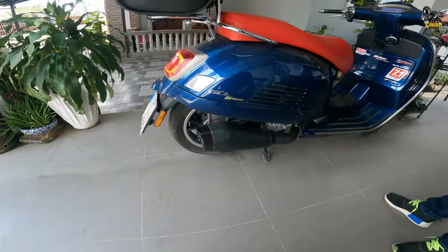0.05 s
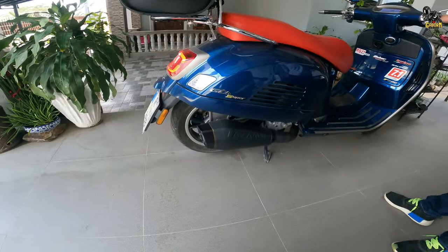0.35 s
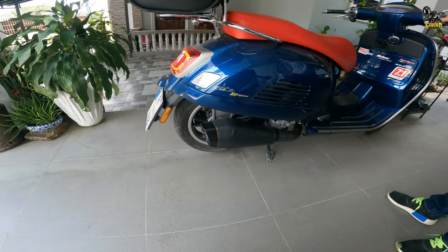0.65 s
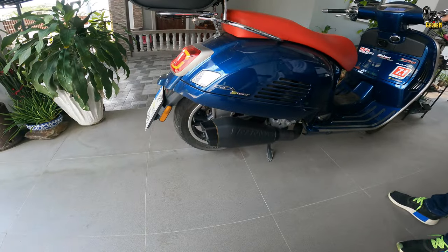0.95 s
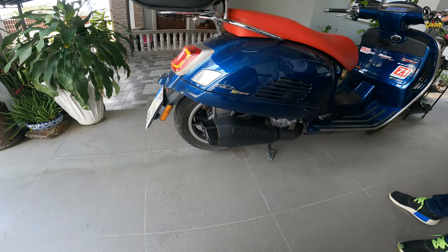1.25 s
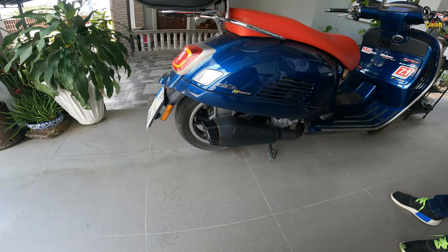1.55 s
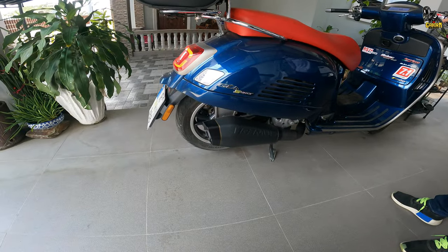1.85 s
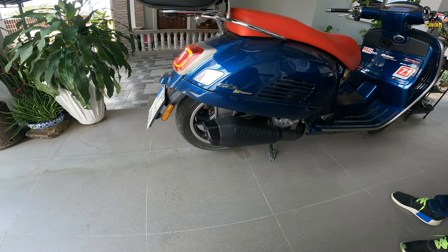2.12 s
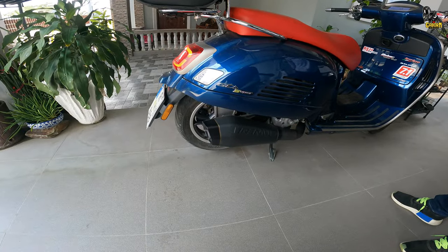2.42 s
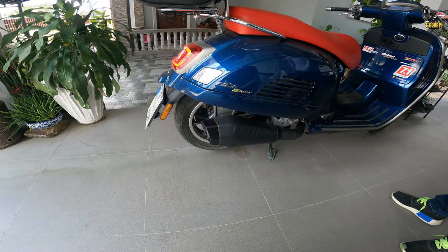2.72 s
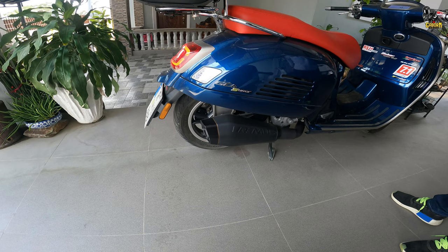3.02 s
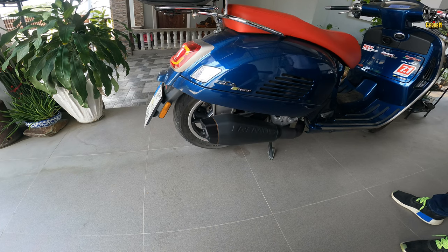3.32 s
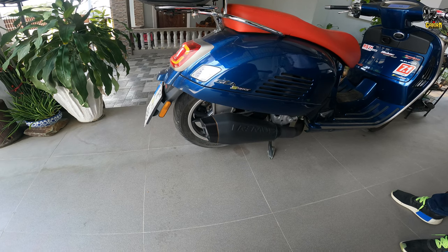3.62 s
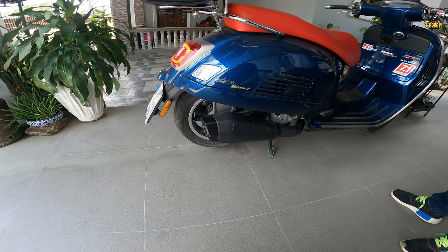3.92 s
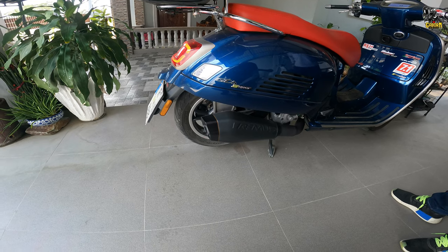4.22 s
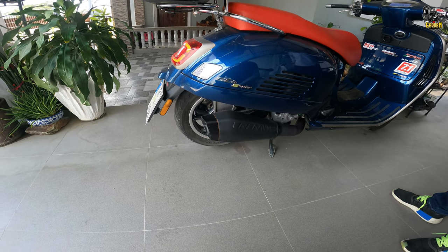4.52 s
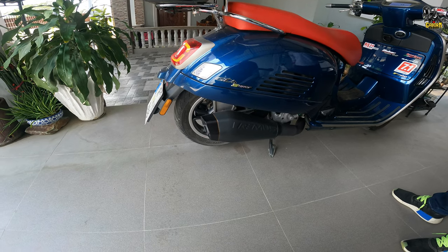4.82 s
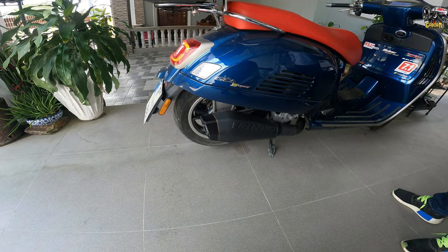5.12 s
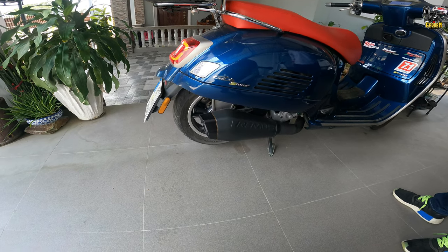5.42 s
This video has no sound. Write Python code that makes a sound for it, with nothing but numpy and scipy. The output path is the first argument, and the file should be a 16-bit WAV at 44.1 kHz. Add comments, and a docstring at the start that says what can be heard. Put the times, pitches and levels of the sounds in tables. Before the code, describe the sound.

Quiet outdoor air and a low hum open the scene, with a few very faint, high whistled notes. At about 0.6 seconds a scooter's starter gives a short, grainy blip. A sharp metallic click follows at 0.9 seconds, while the fuel pump whines softly until 1.5 seconds. At 2 seconds the starter cranks with a pulsing, rattling gear whine, and the single-cylinder engine catches at around 2.5 seconds. It runs slightly fast, then settles to about fifteen deep exhaust thuds a second, with metallic knocking and valve ticks on top. It revs lightly at 4 seconds, drops back to idle, and revs higher at about 5.2 seconds, still running at the end, near 5.6 seconds. The microphone is close, on a porch with a short echo, and the strongest thuds slightly overload it. Everything sits on the left; the right carries only faint hiss.

```python
"""A single-cylinder scooter starts on a tiled porch, idles near 15 firings a second and revs lightly twice.
First the starter blips and the fuel pump primes; then whining gears crank the engine until it catches.
Each exhaust puff and its return gulp ring pipe and muffler, thudding hard enough to overload a near
microphone, while knock and valve taps ring the crankcase. Outdoor air, a hum and a few faint whistled
notes lie behind. All of this is in the left channel; the right holds only faint hiss."""
import sys
import numpy as np
from scipy import signal
from scipy.fft import rfft, irfft, next_fast_len
from scipy.io import wavfile

SR = 44100
rng = np.random.default_rng(int(sys.argv[2]) if len(sys.argv) > 2 else 0)


def master_out(mix):
    """Clip the mix to full scale and print it as 16-bit PCM to the path in sys.argv[1]."""
    frames = np.transpose(np.atleast_2d(mix))
    ceiling = np.clip(frames, -1, 1)
    pcm = np.round(ceiling * 32767).astype(np.int16)
    wavfile.write(sys.argv[1], SR, pcm)


N = 245032
TIME = np.arange(N) / SR
SIZE = next_fast_len(N + SR)
HZ = np.fft.rfftfreq(SIZE, 1 / SR) + 1e-6

# tone colour of the small metal parts (frequency [Hz], level [dB])
SMALL_PARTS_COLOUR = [(150, -58.5), (250, -19), (353, -28), (398, -9), (553, -12.5), (669, -15), (781, -10),
                      (995, -20), (1560, -1.5), (1790, -6), (2240, -2), (2660, -8.5), (4630, -14.5),
                      (10800, -38.5), (15500, -43)]
# swell of the engine's running noise (time [s], level [dB])
RUNNING_LEVEL = [(2.47, -50.5), (2.7, -44.5), (2.95, -49), (3.5, -52.5), (3.9, -56), (3.98, -52),
                 (4.27, -49.5), (4.7, -55), (5.16, -54), (5.21, -45.5), (5.56, -50.5)]


def amp(db):
    """Decibels to gain."""
    return 10 ** (np.asarray(db) / 20)


def unit(x):
    """Scales to rms 1."""
    return x / np.sqrt(np.mean(x ** 2) + 1e-20)


def level(rows):
    """Gain along a (time [s], level [dB]) curve, silent outside it."""
    s, db = np.transpose(rows)
    return amp(np.interp(TIME, s, db, left=-np.inf, right=-np.inf))


def colour(points):
    """EQ curve through (frequency [Hz], level [dB]) points."""
    hz, db = np.transpose(points)
    return amp(np.interp(np.log(HZ), np.log(hz + 1), db))


def causal(gain):
    """Unit-power response with this EQ shape that rings only after the blow."""
    log_gain = np.log(np.maximum(unit(gain), 1e-5))
    cepstrum = irfft(log_gain, SIZE)
    cepstrum[1:SIZE // 2] *= 2
    cepstrum[SIZE // 2 + 1:] = 0
    return np.exp(rfft(cepstrum))


def through(x, response):
    """Filters by a frequency response."""
    return irfft(rfft(x, SIZE) * response, SIZE)[:N]


def resonance(hz, width):
    """Response of one mode, 1 at its peak."""
    return 1 / (1 + 1j * (HZ ** 2 - hz ** 2) / (HZ * width))


def noise():
    """White noise of rms 1."""
    return rng.standard_normal(N)


def drift(hz):
    """Smooth random wander of rms 1, rolling off above hz."""
    return unit(through(noise(), np.exp(-(HZ / hz) ** 2)))


def tone(hz):
    """Sine of rms 1 along a pitch curve."""
    return np.sqrt(2) * np.sin(2 * np.pi * np.cumsum(hz) / SR)


def bursts(times, gains, decay_s):
    """Envelope of sudden blows that die away."""
    blows = np.zeros(N + SR)
    np.add.at(blows, np.round(times * SR).astype(int), gains)
    return signal.lfilter([1], [1, -np.exp(-1 / (decay_s * SR))], blows[:N])


def surges(rows, fall_db_per_s, rise_db_per_s=597):
    """Envelope of surges that rise quickly, hold and run down."""
    curves = [db - rise_db_per_s * np.maximum(s - TIME, 0)
              - fall_db_per_s * np.maximum(TIME - s - hold, 0) for s, hold, db in rows]
    return amp(np.max(curves, axis=0))


def puffs(times, volumes, widths):
    """Bell-shaped puffs, each holding a given volume of gas."""
    at = np.round(times * SR).astype(int)[:, None] + np.arange(-512, 513)
    bells = np.exp(-.5 * ((at / SR - times[:, None]) / widths[:, None]) ** 2) / widths[:, None]
    return np.bincount(at.ravel(), (volumes[:, None] * bells).ravel(), N)[:N] / np.sqrt(2 * np.pi)


def metal(points):
    """Response of the engine's metal: a broad colour with ringing modes standing out."""
    # modes of crankcase and covers (frequency [Hz], width [Hz], level against the broad colour [dB])
    case_modes = [(1281, 100, 0), (1475, 27, -6.5), (1578, 44, -3), (1910, 21, -4.5), (2190, 15, -9),
                  (2930, 14, -16.5), (3080, 40, -2), (5270, 32, -4)]
    peaks = sum(amp(db) * abs(resonance(hz, width)) ** 2 for hz, width, db in case_modes)
    return causal(colour(points) * (1 + peaks))


def hiss():
    """Faint hiss that sinks as the engine catches."""
    # tilt of the hiss (frequency [Hz], level [dB])
    tilt = [(20, -2.5), (200, -11), (1000, -18.5), (4000, -23), (15000, -32)]
    # its fade (time [s], level [dB])
    fade = [(0, -61.5), (2.35, -62.5), (2.6, -68), (3.2, -70.5), (5.56, -74)]
    return level(fade) * unit(through(noise(), colour(tilt)))


def outdoors(air_db=-50, hum_db=-59, hum_hz=119.2):
    """A bed of outdoor air and a wavering far hum."""
    # rumble-heavy air (frequency [Hz], level [dB])
    air_colour = [(12, -34.5), (20, -2.5), (59, -6.5), (90, -13), (122, -7), (180, -21), (372, -24.5),
                  (631, -28.5), (746, -27), (1200, -32.5), (1380, -36.5), (2330, -39), (15500, -55.5)]
    air = amp(air_db + drift(13)) * unit(through(noise(), colour(air_colour)))
    hum = amp(hum_db + 2 * drift(6)) * tone(hum_hz * (1 + 0.017 * drift(7.2)))
    return air + hum


def whistle(fuzz_hz=420):
    """Far, fuzzy notes that swell and fade as they fall in pitch."""
    # whistled notes (start [s], length [s], first pitch [Hz], last pitch [Hz], level [dB])
    notes = [(0, 0.13, 6300, 5660, -65), (0.103, 0.19, 5500, 4750, -68), (0.264, 0.11, 3720, 3680, -65.5)]
    out = np.zeros(N)
    for start, length, first_hz, last_hz, db in notes:
        progress = np.clip((TIME - start) / length, 0, 1)
        swell = np.sqrt(abs(np.sin(np.pi * progress)))
        out += amp(db) * swell * tone(first_hz + (last_hz - first_hz) * progress)
    return out * drift(fuzz_hz)


def porch(x, wet_db=-11, t60_s=.5, predelay_s=.006):
    """Adds a short diffuse tail from tiles and walls."""
    t = TIME[:SR // 2]
    tail = rng.standard_normal(len(t)) * 10 ** (-3 * t / t60_s) * (t > predelay_s)
    return x + amp(wet_db) * signal.fftconvolve(x, tail / np.linalg.norm(tail))[:N]


def fuel_pump(waver=0.0037, whirr_db=-6):
    """The fuel pump whines in a soft whirr while it builds pressure."""
    # priming envelope (time [s], level [dB])
    priming = [(.62, -88), (.78, -57), (1.1, -57.5), (1.2, -57), (1.4, -58.5), (1.45, -61), (1.5, -90)]
    # partials of the whine (frequency [Hz], level [dB])
    partials = [(883, -3), (3429, -20), (6853, -22.5)]
    speed = 1 + waver * drift(130)
    whirr = amp(whirr_db) * through(noise(), metal(SMALL_PARTS_COLOUR))
    whine = sum(amp(db) * tone(hz * speed) for hz, db in partials)
    return level(priming) * (whirr + whine)


def clicks():
    """The starter drive and relays snap home."""
    # metal snaps (time [s], level [dB], decay [s])
    snaps = [(0.027, -56, 0.047), (.574, -54, 0.0054), (.917, -30, 0.011), (1.415, -55.5, 0.0062),
             (2.012, -60.5, 0.0086)]
    blows = sum(bursts(np.array([s]), amp(db), decay) for s, db, decay in snaps)
    return through(blows * noise(), metal(SMALL_PARTS_COLOUR))


def starter_blip(grain_db=3):
    """A first grainy jab of the starter runs down without the engine catching."""
    # surges of the blip (start [s], hold [s], level [dB])
    jabs = [(.605, 0.072, -34), (.735, 0.0067, -35), (.85, 0.0075, -46.5)]
    grain = unit(amp(grain_db * drift(400)))
    return through(surges(jabs, fall_db_per_s=127) * grain * noise(), metal(SMALL_PARTS_COLOUR))


def starter_crank(rattle_db=-0.5, chatter=0.16, waver=0.009, flutter_db=3):
    """Gear teeth whine and rattle, chattering as the armature turns."""
    # one surge for each compression (start [s], hold [s], level [dB])
    compressions = [(2.05, 0.049, -35), (2.142, 0.1, -34), (2.293, 0.029, -33.5), (2.38, 0.022, -30.5)]
    # gear speed, sagging under compression (time [s], tooth rate [Hz])
    tooth_rate = [(2.0, 1339), (2.05, 1551), (2.1, 1608), (2.16, 1382), (2.22, 1566), (2.28, 1667),
                  (2.38, 1554), (2.42, 1386), (2.52, 1253)]
    # tooth tone, armature sidebands and harmonics (multiple of the tooth rate, level [dB])
    partials = [(1, -2), (1.189, -16), (1.4, -9.5), (1.999, -11.5), (3, -15.5)]
    # colour of the rattle (frequency [Hz], level [dB])
    rattle_colour = [(260, -52.5), (450, -17), (661, -18.5), (767, -16), (1030, -26), (1560, -5.5),
                     (1780, -13), (2230, -6.5), (2620, -10.5), (3130, -10), (3690, -15.5), (4880, -14.5),
                     (7500, -33), (11500, -33), (15500, -55)]
    effort = surges(compressions, fall_db_per_s=290)
    mesh_hz = np.interp(TIME, *np.transpose(tooth_rate)) * (1 + waver * drift(120))
    whine = sum(amp(db) * tone(k * mesh_hz) for k, db in partials)
    shake = unit(np.maximum(1 + chatter * tone(mesh_hz / 4), 0))
    rattle = through(effort * shake * noise(), metal(rattle_colour))
    flutter = unit(amp(flutter_db * drift(55)))
    return amp(rattle_db) * rattle + effort * whine * flutter


def engine_cycles(first_firing_s=2.5497, idle_hz=15, load_scatter_db=.45, knock_scatter_db=1.6):
    """Speed times each cycle and load sets its strength; returns one array per column of coughs."""
    # uneven first strokes, on the starter and as the engine catches
    # (time [s], blowdown [dB], gulp lag [s], gulp [dB], gulp width [s], knock [dB])
    coughs = [(2.0493, -14, 0.014, -11, 0.00074, -63.5), (2.1765, -3.5, 0.0027, 2, 0.00059, -73),
              (2.381, -8, .0125, 9.5, 0.0026, -74), (2.4412, -10.5, 0.0035, 10, 0.0013, -46),
              (2.518, -6.5, .0052, 4.5, .0019, -35.5), (2.6102, -8.5, 0.0027, 8, 0.0019, -35.5)]
    # engine speed under its own power (time [s], firing rate [Hz])
    revs = [(2.555, 11.324), (2.648, 12.717), (2.877, 17.706), (2.966, 17.267), (3.298, 17.292),
            (3.578, 14.629), (3.903, 14.535), (4.111, 23.076), (4.257, 21.552), (4.438, 17.124),
            (4.683, 14.17), (4.842, 14.841), (4.972, 13.226), (5.182, 15.153), (5.317, 30.277),
            (5.468, 26.209)]
    # load on the piston (time [s], level [dB])
    load = [(2.55, -2), (2.73, -0.1), (2.95, 0), (3.35, -1.96), (3.88, -2), (3.97, -0.7), (4.16, -.5),
            (4.36, -2), (4.55, -1.8), (5.13, -1.77), (5.22, 2), (5.32, 1), (5.38, 1.5), (5.54, 0)]
    # no combustion: one misfire, then the overrun after each rev (start [s], end [s])
    unfired_spells = [(2.99, 3.04), (4.22, 4.315), (5.34, 5.52)]
    rate = np.interp(TIME, *np.transpose(revs))
    count = np.cumsum(rate * (TIME >= first_firing_s)) / SR
    s = TIME[np.diff(np.ceil(count), prepend=0) > 0]
    speed = np.interp(s, TIME, rate) / idle_hz
    octaves = np.log2(speed)
    chance = rng.standard_normal((len(s), 2))
    load_db = np.interp(s, *np.transpose(load))
    # at speed the blowdown is weaker, the gulp sooner and harder
    blow_db = load_db - 0.5 * octaves + load_scatter_db * chance[:, 0]
    lag_s = 0.0034 / speed ** 0.43
    gulp_db = blow_db + 4.5 + octaves
    knock_db = -39 + 3.8 * load_db + knock_scatter_db * chance[:, 1]
    fired = np.broadcast_arrays(s, blow_db, lag_s, gulp_db, .0011, knock_db)
    # a coasting stroke is weaker, with a late, broad gulp and hardly any knock
    unfired = np.broadcast_arrays(s, blow_db - 1, 0.01289, blow_db, 0.0023, -54.5)
    coasting = np.any([(s > start) & (s < end) for start, end in unfired_spells], axis=0)
    cycles = np.hstack([np.transpose(coughs), np.where(coasting, unfired, fired)])
    return cycles[:, np.argsort(cycles[0])]


def rocker(cycles, ping_db=-42, lead_s=0.0033, scatter_db=5.5):
    """The rocker hits the exhaust valve just before each blowdown and briefly pings the cover."""
    s = cycles[0]
    hits = amp(ping_db + scatter_db * rng.standard_normal(len(s)))
    cover = sum(amp(db) * tone(hz * (1 + 0.018 * drift(40))) for hz, db in [(1582, -1.5), (1710, -5.5)])
    return bursts(s - lead_s, hits, decay_s=.004) * cover


def clatter(cycles, rustle_db=-3, grain_db=2, scatter_db=3, knock_gain=1.6045):
    """Combustion knock, valve taps and chain rustle ring the crankcase."""
    # valve train taps (position [share of the cycle], level against the running noise [dB])
    valve_taps = [(0.302, 3.5), (.46, -10.5), (.86, 0)]
    # colour of the crankcase (frequency [Hz], level [dB])
    case_colour = [(530, -34), (900, -14.5), (1090, -21.5), (1350, -12), (1590, -1.5), (1860, -8.5),
                   (2100, -7.5), (3000, -13.5), (3220, -14.5), (4660, -15), (5310, -21), (5840, -18.5),
                   (6580, -24.5), (11900, -38), (15500, -46)]
    s, *_, knock_db = cycles
    period = np.minimum(np.gradient(s), .075)
    taps = np.zeros(N)
    for share, db in valve_taps:
        hits = amp(db + scatter_db * rng.standard_normal(len(s)))
        taps += bursts(s + share * period, hits, decay_s=0.0096)
    rustle = amp(rustle_db) * unit(amp(grain_db * drift(300)))
    running = level(RUNNING_LEVEL) * (rustle * noise() + taps * noise())
    knock = bursts(s - .001, amp(knock_db), decay_s=0.0069) * noise()
    treble_lift = causal(np.sqrt(1 + (HZ / 7000) ** 2))
    return through(running + knock_gain * through(knock, treble_lift), metal(case_colour))


def chamber(cycles, ring_db=-12, delay_s=0.0176, centre_hz=262, rise_hz_per_s=2800, spread_s=0.0055):
    """The muffler's second chamber swells just after a blowdown; its pitch rises as hot gas fills it."""
    s, blow_db = cycles[:2, 3:]  # from the fourth stroke on
    t = TIME[:SR // 20] - delay_s
    swell = np.exp(-.5 * (t / spread_s) ** 2)
    chirp = np.cos(2 * np.pi * (centre_hz + .5 * rise_hz_per_s * t) * t)
    blows = np.bincount(np.round(s * SR).astype(int), amp(blow_db), N)[:N]
    return amp(ring_db) * signal.fftconvolve(blows, swell * chirp)[:N]


def exhaust(cycles, thud_db=-58, blow_width_s=0.00081, muffler_hz=292, bark_db=-35, flow_db=-55):
    """Each blowdown and the gulp after it ring the pipe and muffler; the jet adds a short rasp."""
    # resonances rung by the blowdown (frequency [Hz], width [Hz], signed gain)
    blow_modes = [(62.5, 3.9, 1.64), (83.35, 5.84, 6), (98.03, 7.55, 3), (146.2, 39, 1.56),
                  (251.7, 19.23, 3.5), (272.65, 4, 6.5), (275, 15.6, -1), (313, 23, -2), (381, 5.3, -0.1)]
    # resonances rung by the return gulp (frequency [Hz], width [Hz], signed gain)
    gulp_modes = [(82.7, 8.2, 1.29), (104.6, 13.55, 2.07), (156.25, 5.9, 1.73), (198.3, 8.7, 4.4),
                  (218.26, 2.64, 1.65), (240.6, 25.5, 4.18)]
    # colour of the jet's rasp (frequency [Hz], level [dB])
    rasp_colour = [(200, -31), (340, -6.5), (490, -2.5), (650, -10), (850, -19.5), (1200, -21.5),
                   (2500, -29), (8000, -59.5)]
    # reflections from body and porch (delay [s], signed gain)
    echoes = [(.0078, 0.28), (0.0185, -0.055), (0.025, -.26), (.0368, -0.29)]
    s, blow_db, lag_s, gulp_db, gulp_width_s, _ = cycles
    # a slow stroke lets out a longer, deeper puff
    stretch = np.maximum(np.diff(s, append=s[-1]) / .062, 1)
    blows = puffs(s, amp(blow_db) * stretch, blow_width_s * stretch)
    gulps = puffs(s + lag_s, amp(gulp_db) * stretch, gulp_width_s * stretch)
    blow_ring = through(blows, sum(g * resonance(hz, width) for hz, width, g in blow_modes))
    gulp_ring = through(gulps, sum(g * resonance(hz, width) for hz, width, g in gulp_modes))
    muffler = signal.freqs(*signal.butter(4, 1, analog=True), HZ / muffler_hz)[1]
    thud = amp(thud_db) * through(gulp_ring - blow_ring, muffler)
    # turbulence follows the blowdown, over a weak continuous flow
    bark = amp(bark_db) * bursts(s, amp(blow_db), decay_s=0.013)
    flow = amp(flow_db) * unit(level(RUNNING_LEVEL))
    rasp = through((bark + flow) * noise(), causal(colour(rasp_colour)))
    reflections = sum(g * np.exp(-2j * np.pi * HZ * delay) for delay, g in echoes)
    return through(thud + rasp, 1 + reflections)


def scene():
    """The scooter and its surroundings on the left, hiss alone on the right."""
    cycles = engine_cycles()
    mechanics = clatter(cycles) + rocker(cycles) + starter_crank() + starter_blip()
    mechanics += clicks() + fuel_pump()
    left = exhaust(cycles) + chamber(cycles) + porch(mechanics + whistle()) + outdoors()
    return np.array([amp(4) * left, hiss()])


def record(dry, cutoff_hz=15750):
    """The strongest thuds flatten at full scale; a steep low-pass then trims the top."""
    clipped = dry / (1 + dry ** 16) ** (1 / 16)
    lowpass = signal.firwin(511, cutoff_hz, window=("kaiser", 9), fs=SR)
    return signal.oaconvolve(clipped, lowpass[None], "same")


dry = scene()
out = record(dry)
master_out(out)
```